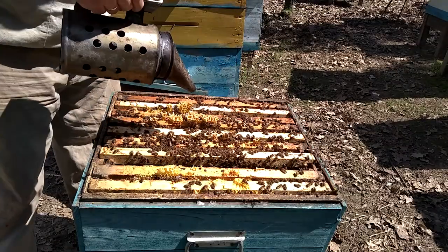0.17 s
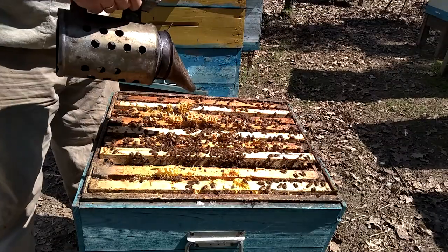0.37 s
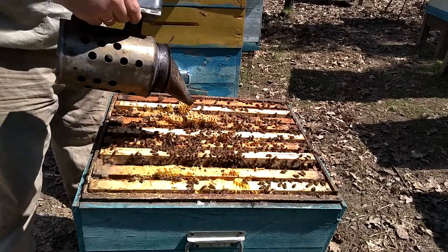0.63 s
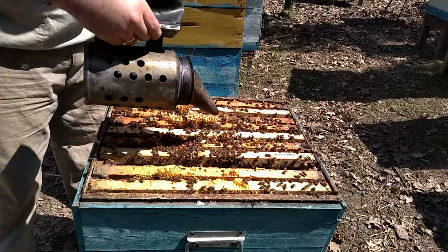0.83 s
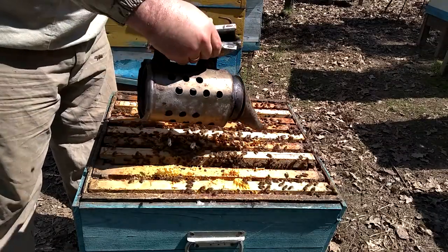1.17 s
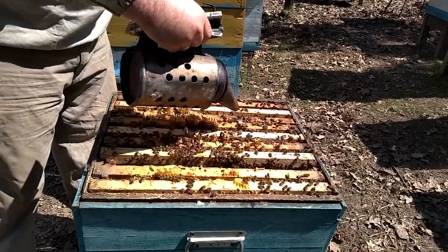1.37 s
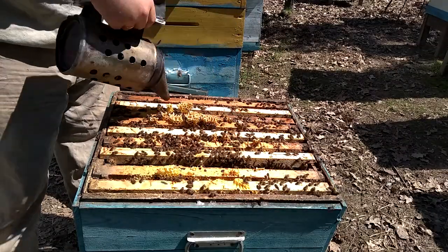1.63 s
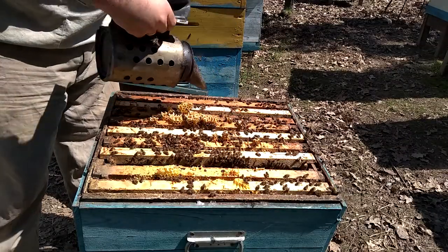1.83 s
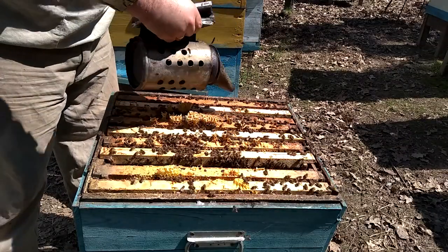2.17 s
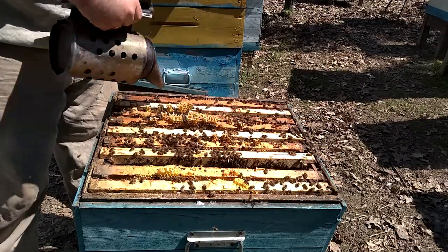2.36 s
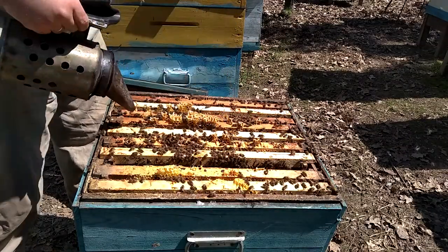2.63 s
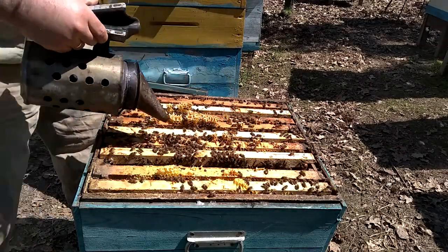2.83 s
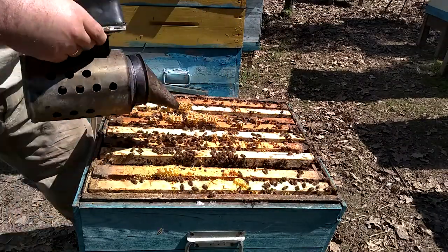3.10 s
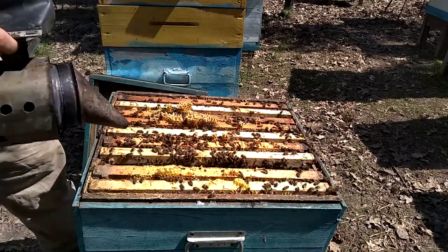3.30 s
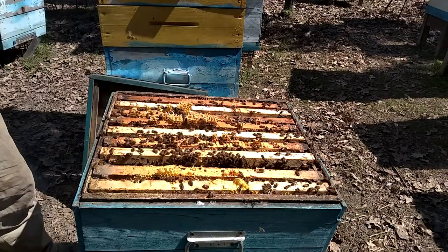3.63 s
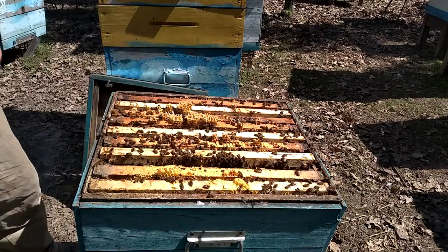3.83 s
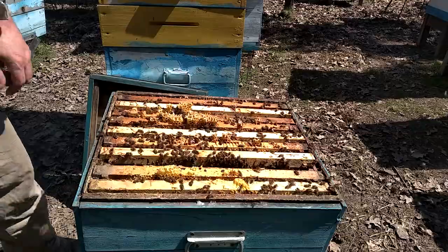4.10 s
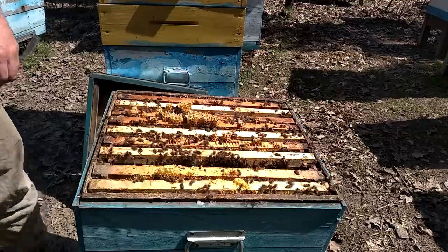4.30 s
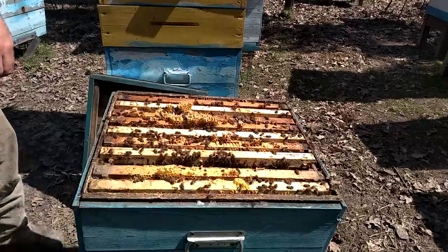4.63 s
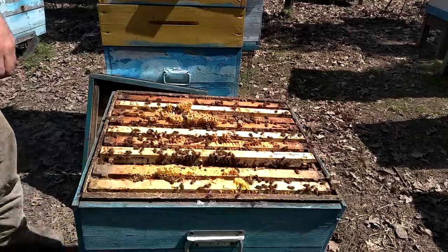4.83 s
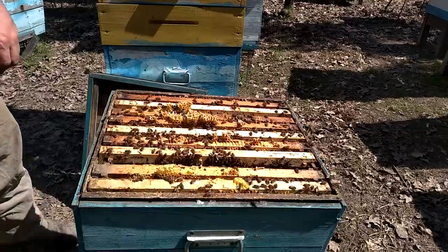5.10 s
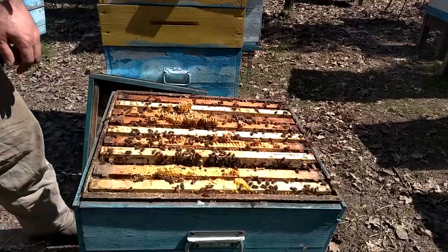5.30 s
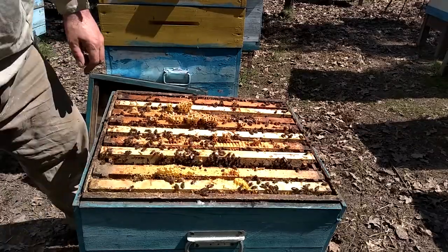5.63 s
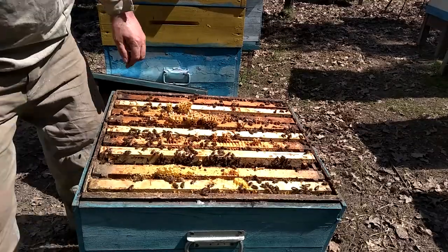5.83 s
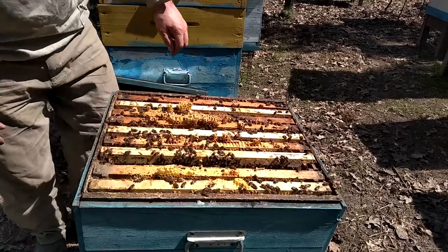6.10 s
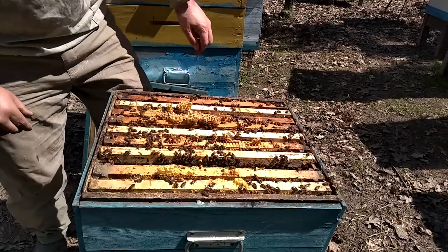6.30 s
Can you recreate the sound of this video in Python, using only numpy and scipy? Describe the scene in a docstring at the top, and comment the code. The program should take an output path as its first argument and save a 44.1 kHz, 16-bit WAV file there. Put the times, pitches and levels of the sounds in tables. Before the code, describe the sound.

A smoker puffs hollowly about five times a second with crinkling leather bellows, then a sharp hollow knock and rough scrape over faint bee hum outdoors.

```python
"""A beekeeper puffs a smoker: air pulses ring the hollow can, and its leather bellows crinkle in grainy bursts.
Close by there are faint squeaks, dry ticks, hard knocks that ring a shell, and brushing made of tiny slips.
Cloth swishes as grainy noise and footsteps thud on soil as short pushes of low noise.
Underneath, bees hum as stacks of harmonics, a small bird whistles in gliding tones, and the air is soft noise."""
import sys
import numpy as np
from scipy import signal
from scipy.fft import rfft, irfft, next_fast_len
from scipy.io import wavfile
from scipy.ndimage import uniform_filter1d, map_coordinates

SR = 44100
rng = np.random.default_rng(int(sys.argv[2]) if len(sys.argv) > 2 else 0)


def to_wav(s):
    """Save 16-bit WAV."""
    ch = np.atleast_2d(s).T  # columns
    pcm = np.round(np.clip(ch, -1, 1) * 32767)  # PCM
    wavfile.write(sys.argv[1], SR, pcm.astype(np.int16))


N = 284841
TIME = np.arange(N) / SR  # seconds

# Colour of small dry crackles. Each row: frequency in Hz, relative level in dB.
LEATHER_COLOUR = [(200, -36), (900, -7.5), (1600, -7), (2400, 1.5), (3100, 0.5), (4000, 0.5), (5000, 3),
                  (6400, -2.5), (7700, -6), (8600, -20), (12000, -26), (16000, -47.5)]


def amp(db):
    """Turns decibels into a plain multiplier."""
    return 10 ** (np.asarray(db) / 20)


def unit(x):
    """Scales a sound to an rms (average strength) of 1."""
    return x / np.sqrt(np.mean(x ** 2) + 1e-20)


def along(points, hz):
    """Reads a curve of (Hz, value) points, with frequency on a log axis."""
    f, v = np.transpose(points)
    return np.interp(np.log(hz + 1), np.log(f + 1), v)


def wobble(rate):
    """A smooth random curve through `rate` random points a second."""
    knots = rng.standard_normal(int(N * rate / SR) + 4)
    coarse_time = TIME[::16]
    return np.interp(TIME, coarse_time, map_coordinates(knots, [coarse_time * rate]))


def filtered(x, response):
    """Multiplies the spectrum of x by a response that depends on frequency."""
    size = next_fast_len(N + SR // 2)
    spectrum = rfft(x, size) * response(np.fft.rfftfreq(size, 1 / SR))
    return irfft(spectrum, size)[..., :N]


def low_cut(x, hz, order):
    """Removes the bass below hz."""
    return signal.sosfilt(signal.butter(order, hz, "high", fs=SR, output="sos"), x)


def resonances(modes, hz):
    """Response of an object that rings at each (Hz, width in Hz, dB), with alternating signs."""
    total = 0
    for k, (centre, width, db) in enumerate(modes):
        ringing = 1j * hz * width / (centre ** 2 - hz ** 2 + 1j * hz * width)
        total = total + (-1) ** k * amp(db) * ringing
    return total


def pan(right_db):
    """Left and right gains of constant power; the right is right_db stronger."""
    gains = amp(np.array([[-1], [1]]) * right_db / 2)
    return gains / np.sqrt(np.mean(gains ** 2, axis=0))


def ports(pair, response):
    """Colours two unrelated signals and mixes them as two spaced microphone ports hear them, at rms 1."""
    # Each row: frequency in Hz, likeness of left and right from 0 to 1.
    alike = [(100, 0.92), (330, 0.8), (650, 0.67), (1300, 0.88), (2200, .52), (3000, 0.81), (4000, 0.25),
             (12000, 0.12)]
    # Each row: frequency in Hz, phase by which the left leads in radians.
    port_lead = [(100, -2), (330, 0.12), (650, 1.4), (1000, 3), (1300, 3.5), (2000, 5), (2800, 4),
                 (3600, 3.2), (5000, 1.58), (12000, 1)]

    def mix(hz):
        turn = np.arccos(np.clip(along(alike, hz), -1, 1)) / 2
        return response(hz) * np.array([np.cos(turn), np.sin(turn)])

    def shift(hz):
        return np.exp(.5j * np.array([[1], [-1]]) * along(port_lead, hz))

    mid, side = filtered(pair, mix)
    return unit(filtered(np.array([mid + side, mid - side]), shift))


def noise(spectrum):
    """Smooth stereo noise of the given colour, at rms 1."""
    return ports(rng.standard_normal((2, N)), lambda hz: amp(along(spectrum, hz)))


def ringing_noise(modes):
    """Stereo noise coloured by the resonances of an object, at rms 1."""
    return ports(rng.standard_normal((2, N)), lambda hz: resonances(modes, hz))


def patches(x, depth_db):
    """Lets the colour shift at random from moment to moment."""
    cells = signal.stft(x, nperseg=256)[2]
    field = rng.standard_normal(cells.shape[1:])
    for _ in range(2):
        field = uniform_filter1d(field, size=3, axis=0)  # smooth over frequency
        field = uniform_filter1d(field, size=7, axis=1)  # smooth over time
    return signal.istft(cells * amp(depth_db * unit(field)), nperseg=256)[1][:, :N]


def grains(spectrum, rate, spread_db, patchy_db):
    """Tiny slips, about `rate` a second, of random size and shifting colour, at rms 1."""
    happens = rng.random(N) < rate / SR
    sizes = amp(spread_db * np.clip(rng.standard_normal(N), -2, 2))
    slips = happens * sizes * rng.standard_normal((2, N))
    return ports(patches(slips, patchy_db), lambda hz: amp(along(spectrum, hz)))


def steady(x, size):
    """Evens out the strength of a sound over `size` samples."""
    power = uniform_filter1d(np.mean(x ** 2, axis=0), size=size)
    power = uniform_filter1d(power, size=size)
    return x / np.sqrt(np.abs(power) + 0.0083)


def swell(s, rise, fall):
    """A rounded push that peaks at s; rise and fall are in seconds."""
    d = TIME - s
    return np.exp(1 - np.hypot(1, np.clip(d / np.where(d < 0, rise, fall), -40, 40)))


def burst(s, t60):
    """A sudden start at s that falls 60 dB in t60 seconds."""
    return (TIME >= s) * amp(-60 * np.clip((TIME - s) / t60, 0, 4))


def slide(s, length, attack, release):
    """A movement that sets in smoothly at s, holds for its length and dies away."""
    onset = (1 - np.exp(-np.maximum(TIME - s, 0) / attack)) ** 2
    return onset * np.exp(-np.clip((TIME - s - length) / release, 0, 40))


def strokes(events):
    """Adds short (start s, stereo sound, dB per octave) events, each tilted about 4 kHz at equal strength."""
    out = np.zeros((2, N + SR))
    size = SR // 4
    octaves = np.log2(np.clip(np.fft.rfftfreq(size, 1 / SR), 1800, 6500) / 4000)
    for s, sound, tilt in events:
        start = round((s - .02) * SR)
        piece = sound[:, start:start + size]
        tilted = irfft(rfft(piece, size) * amp(tilt * octaves), size)
        out[:, start:start + size] += tilted * np.linalg.norm(piece) / np.linalg.norm(tilted)
    return out[:, :N]


def scattered_echo(x, t60):
    """Many thin reflections, as from trunks and hives, arrive from 6 ms on and die away."""
    t = TIME[:SR // 2]
    tail = rng.standard_normal((2, len(t))) * amp(-60 * t / t60) * (t > .006)
    return signal.fftconvolve(x, tail / np.linalg.norm(tail[0]), axes=1)[:, :N]


def outdoor_air():
    """Soft noise whose level drifts slowly."""
    # Each row: frequency in Hz, relative level in dB.
    outdoors = [(15, -61), (25, -37), (123, -9.5), (194, 0), (316, -8), (542, -8), (1180, -5), (1820, -10),
                (2960, -13), (3210, -12.5), (6840, -14), (7620, -13), (8490, -30.5), (12100, -29),
                (15800, -47)]
    return amp(-68.0 + 1.5 * wobble(0.8)) * noise(outdoors) * pan(right_db=0.5)


def wingbeat(hz):
    """The buzz of one bee: 14 harmonics of its wingbeat with an unsteady pitch, at rms 1."""
    # Strength of the buzz. Each row: frequency in Hz, relative level in dB.
    wings = [(150, -10.5), (250, -1), (520, 0), (800, -13), (1500, -15.5), (3000, -30.5), (6000, -44)]
    order = np.arange(1, 15)
    cycle = np.linspace(0, 1, 513)
    phases = rng.random((len(order), 1))
    harmonics = np.sin(2 * np.pi * (order[:, None] * cycle + phases))
    stroke = amp(along(wings, hz.mean() * order)) @ harmonics
    turns = np.cumsum(hz * np.exp(0.023 * wobble(32))) / SR
    return np.interp(turns % 1, cycle, unit(stroke))


def bees(count):
    """Bees swell and fade, each at its own wandering pitch; one comes close, others patter on the frames."""
    # One bee swings close. Each row: moment in seconds, wingbeat in Hz, level in dB.
    bee_passes = [(5.39, 283, -76.5), (5.72, 261, -74.5), (6.359, 262, -64.5)]
    hum = np.zeros((2, N))
    for wing_hz in np.geomspace(180, 272, count):
        bee = wingbeat(wing_hz * np.exp(0.05 * wobble(7))) * amp(4.5 * wobble(2.2))
        hum += bee * pan(right_db=5.5 + 2.7 * rng.standard_normal())
    hum = amp(-72.5) * unit(hum + scattered_echo(hum, t60=0.59))

    times, pitches, _ = np.transpose(bee_passes)
    nearness = sum(amp(db) * swell(s, rise=0.074, fall=.08) for s, _, db in bee_passes)
    close = nearness * wingbeat(np.interp(TIME, times, pitches))

    patter = grains(LEATHER_COLOUR, rate=50, spread_db=-0.5, patchy_db=0.5)
    return hum + close + amp(-86.5) * patter * pan(right_db=6)


def bird():
    """Whistles are single gliding tones with a slight tremble; far calls are narrow bands of noise."""
    # Each row: start in seconds, length in seconds, first pitch in Hz, last pitch in Hz, level in dB.
    whistles = [(2.176, 0.036, 7650, 7850, -64.5), (2.269, 0.098, 7150, 8000, -56),
                (2.742, 0.038, 8050, 7850, -58), (2.836, .14, 7100, 7950, -61),
                (3.204, 0.19, 7050, 7250, -57), (3.746, 0.042, 7800, 7650, -60.5),
                (3.871, .26, 6750, 7850, -57.5), (4.819, 0.1, 7150, 7850, -57.5),
                (6.39, .086, 6950, 7700, -71)]
    # Calls farther off, blurred by the wood. Each row: moment in seconds, level in dB.
    far_birds = [(5.241, -64.5), (5.849, -67.5), (6.0, -76), (6.44, -65)]
    arch_hz_per_s = 1900  # longer whistles arch higher above their straight glide
    song = np.zeros(N)
    tremble = 1 + .011 * wobble(500)
    for s, length, first_hz, last_hz, db in whistles:
        u = np.clip((TIME - s) / length, 0, 1)  # progress through the whistle
        arch = np.sin(np.pi * u)
        hz = first_hz + (last_hz - first_hz) * u + arch_hz_per_s * length * arch
        tone = np.sqrt(2) * np.sin(2 * np.pi * np.cumsum(hz * tremble) / SR)
        song += amp(db) * arch * tone
    song = song * amp(2.4 * wobble(90)) * pan(right_db=8.0)

    calls = sum(amp(db) * swell(s, rise=.04, fall=0.059) for s, db in far_birds)
    band = noise([(5200, -58.5), (6300, -6.0), (7600, -2.0), (8400, -51)])
    far = calls * patches(band, depth_db=1.5) * pan(right_db=-1)
    return song + amp(-14) * scattered_echo(song, t60=.5) + far


def walking():
    """Cloth slides on cloth in grainy swishes, and boots press soil and dead leaves."""
    # A sleeve, then trouser legs.
    # Each row: start in seconds, length in seconds, level in dB, right over left in dB.
    swishes = [(3.045, 0.11, -45, 12), (3.151, 0.052, -56, 11), (5.508, 0.073, -52.5, 9),
               (5.586, 0.05, -52, 14), (5.617, 0.13, -43, 21), (5.682, 0.044, -45, 24)]
    # Footfalls. Each row: moment in seconds, thud level in dB, leaf litter level in dB.
    footfalls = [(4.952, -59.5, -77), (6.026, -43, -64), (6.311, -38.5, -47.5), (6.357, -63, -56)]
    # Colours of cloth and of soil. Each row: frequency in Hz, relative level in dB.
    fabric = [(60, -33), (130, -12), (280, -5.5), (600, -6), (920, -6), (1300, -9), (2000, -2.5),
              (3100, -6.5), (5000, 2.5), (7600, -1), (8800, -12.5), (15800, -24.5)]
    soil = [(25, -23), (60, -32), (110, 3.5), (190, -3.5), (310, -8), (440, -14.5), (700, -24), (2000, -30),
            (6000, -59)]
    cloth = grains(fabric, rate=9200, spread_db=1.5, patchy_db=4.0)
    rub = 0
    for s, length, db, right_db in swishes:
        rub = rub + amp(db) * slide(s, length, attack=0.0085, release=.011) * pan(right_db)
    swish = cloth * rub * amp(0.76 * wobble(70))

    weight = sum(amp(db) * swell(s, rise=0.0082, fall=0.012) for s, db, _ in footfalls)
    thud = weight * steady(noise(soil), size=900) * pan(right_db=6.5)
    # the leaves give just before the thud; they share the grains of the cloth
    crush = sum(amp(db) * swell(s - .006, rise=0.0096, fall=0.01) for s, _, db in footfalls)
    return swish + thud + crush * cloth * pan(right_db=4.5)


def ticks():
    """Small dry things snap: noise that starts at once and dies away."""
    # Each row: moment in seconds, level in dB.
    snap_list = [(3.615, -54.5), (3.759, -59), (3.862, -39), (4.88, -53), (4.929, -42.5), (4.948, -44),
                 (6.305, -47), (6.362, -57)]
    snaps = sum(amp(db) * burst(s, t60=0.037) for s, db in snap_list)
    return snaps * noise(LEATHER_COLOUR) * pan(right_db=15)


def brushing():
    """A surface drags close by: a hiss of dense slips over a lumpy rumble, both swelling with pressure."""
    # Each row: start in seconds, length in seconds, moment of greatest pressure in seconds,
    # relative friction level in dB, relative rumble level in dB.
    brushes = [(3.973, 0.11, 4.02, -30.5, -42), (4.413, 0.3951, 4.608, -21, -33.5)]
    # The surface catches and bumps. Each row: moment in seconds, level in dB.
    bumps = [(4.592, -26.5), (4.597, -30.5), (4.616, -35.5), (4.645, -25.5)]
    # Colours of the hiss and of the rumble. Each row: frequency in Hz, relative level in dB.
    friction = [(250, -29), (600, -10.5), (1000, 2.5), (1300, -2.5), (2200, -3.5), (2600, -3.5),
                (3100, -6.5), (3700, -3.5), (4800, -3), (5450, 1), (5850, -2), (6500, -1.5), (7500, -3),
                (8800, -16.5), (12000, -22), (15800, -29.5)]
    rumble_colour = [(25, -25.5), (55, -13.5), (90, -2.5), (125, 0), (190, -8), (235, -11), (310, 5.5),
                     (400, -1), (510, -12.5), (800, -40.5), (2000, -65.5)]
    slip_lead_s, slip_db = 0.014, -1  # a spurt of hiss just before each bump, relative to it
    hiss = sum(amp(db + slip_db) * swell(s - slip_lead_s, rise=.002, fall=0.0032) for s, db in bumps)
    rumble = sum(amp(db) * swell(s, rise=0.0072, fall=0.0018) for s, db in bumps)
    for s, length, peak_s, hiss_db, rumble_db in brushes:
        pressure = swell(peak_s, rise=0.11, fall=.07)
        attack = 0.092 * length
        # the hiss follows the pressure less strongly than the rumble does
        hiss = hiss + amp(hiss_db) * slide(s, length, attack, release=0.0082) * pressure ** 0.24
        rumble = rumble + amp(rumble_db) * slide(s, length, attack, release=0.021) * pressure

    slips = grains(friction, rate=25000, spread_db=2.0, patchy_db=3.5)
    # a short scattered echo makes the colour uneven
    slips = unit(slips + 0.61 * scattered_echo(slips, t60=.035))
    slips = steady(slips, size=250) * amp(1.1 * wobble(110))
    # the hiss lies to the right; the long stroke swings through the middle
    place = pan(9.5 - 9.5 * swell(4.615, rise=0.1, fall=0.051))
    return hiss * slips * place + rumble * steady(noise(rumble_colour), size=600) * pan(right_db=3)


def knock():
    """Hard contacts rattle a shell, heard as ringing noise, and sound a hollow note."""
    # Each row: moment in seconds, level in dB, time to fall 60 dB in seconds,
    # brightness in dB per octave, hollow note level in dB.
    knocks = [(3.9893, -21.5, 0.063, -2, -33), (3.9935, -21.5, 0.046, -4.5, -19.5),
              (4.026, -24.5, 0.076, 2, -24.5), (5.661, -56.5, 0.036, -5, -47)]
    # What the shell rings with. Each row: frequency in Hz, width in Hz, relative level in dB.
    shell = [(370, 150, -5.5), (791, 25, 5), (990, 120, -9), (1440, 115, 3), (2310, 63, 6.5),
             (3750, 150, -0.5), (4650, 45, 11), (5470, 200, 3.5), (6840, 90, -3), (7480, 400, 1.5)]
    ring = steady(ringing_noise(shell), size=200) * pan(right_db=1.5)
    crack = strokes((s, amp(db) * burst(s, t60) * ring, tilt) for s, db, t60, tilt, _ in knocks)
    note_hz = 795
    note = 0
    for s, *_, db in knocks:
        note = note + amp(db) * burst(s, t60=0.051) * np.sin(2 * np.pi * note_hz * (TIME - s))
    return crack + note * pan(right_db=5.0)


def squeaks():
    """Tiny rough squeaks: quick swells of noise centred near 5 kHz."""
    # Each row: moment in seconds, level in dB.
    squeak_list = [(0.221, -62), (0.435, -60.5), (.49, -71), (.748, -65), (1.096, -62), (1.141, -61)]
    rasp = noise([(3000, -32), (4600, 6), (5300, 4), (7000, -15), (9000, -43)])
    swells = sum(amp(db) * swell(s, rise=0.00087, fall=0.0069) for s, db in squeak_list)
    return swells * rasp * pan(right_db=5)


def bellows():
    """Each leather fold gives way suddenly and crinkles on, weakening; quick folds are the brightest."""
    # Mostly as a squeeze begins. Each row: start in seconds, length in seconds, starting level in dB.
    creases = [(0.244, .015, -61.5), (0.689, 0.016, -49), (0.811, 0.04, -45.5), (1.412, 0.032, -47.5),
               (1.646, 0.031, -58.5), (1.83, 0.015, -46.5), (1.851, 0.075, -57), (1.905, 0.0044, -48),
               (1.973, 0.0084, -53), (2.025, 0.0091, -47), (2.041, .044, -39), (2.279, 0.028, -40.5),
               (2.314, 0.0034, -52), (2.44, 0.024, -42), (2.5, 0.034, -33.5), (2.695, .026, -24),
               (2.846, 0.026, -47.5), (2.902, 0.011, -33)]
    sag_db_per_s = 149
    tilt_db, dulling_db_per_s = 2, 98  # dB per octave of a very quick fold, and its loss per second of length
    flutter = amp(2.7 * wobble(220))
    leather = grains(LEATHER_COLOUR, rate=6000, spread_db=1.5, patchy_db=3.0)
    crinkle = steady(leather * flutter, size=700) * pan(right_db=8.5)
    folds = []
    for s, length, db in creases:
        sag = amp(-sag_db_per_s * np.clip(TIME - s, 0, length))
        fold = slide(s, length, attack=0.0022, release=0.01) * sag
        folds.append((s, amp(db) * fold * crinkle, tilt_db - dulling_db_per_s * length))
    return strokes(folds)


def smoker():
    """Each squeeze drives air through the can, which answers with a hollow note under the rush of air."""
    # Squeezes, about five a second.
    # Each row: moment in seconds, relative level of the hollow tone in dB, relative level of the rush in dB.
    puffs = [(0.255, -54.5, -66.5), (0.475, -53, -63), (0.671, -41.5, -55.5), (0.888, -47, -56.5),
             (1.084, -51.5, -63.5), (1.276, -42.5, -55), (1.483, -50.5, -62.5), (1.698, -57.5, -67),
             (1.903, -46, -58.5), (1.986, -58.5, -67), (2.108, -38.5, -54.5), (2.32, -35, -51.5),
             (2.531, -37, -51), (2.719, -32.5, -38), (2.928, -35, -47), (3.122, -39.5, -51),
             (3.342, -58, -59.5)]
    # What the can rings with. Each row: frequency in Hz, width in Hz, relative level in dB.
    can = [(271, 28.4, 12.5), (330, 70, -10), (423, 32, -3.5)]
    # Colour of the rushing air. Each row: frequency in Hz, relative level in dB.
    rush_colour = [(30, -12), (80, 9.5), (160, -6), (260, -3), (550, 5), (800, -1), (1100, 1), (1800, -1),
                   (3000, -4.5), (8000, -13.5), (16000, -96)]
    push, flow = 0, 0
    for s, hollow_db, rush_db in puffs:
        # the air starts moving, then surges as the bellows close
        start = .5 * swell(s - .019, rise=0.0058, fall=0.006)
        surge = swell(s + 0.0032, rise=0.0054, fall=0.0058)
        push = push + amp(hollow_db) * (start + surge)
        flow = flow + amp(rush_db) * swell(s, rise=0.013, fall=0.012)

    def can_response(hz):
        return resonances(can, hz) / (1 + (hz / 900) ** 2)  # duller above 900 Hz

    hollow = steady(ports(rng.standard_normal((2, N)), can_response), size=450)
    jet = grains(rush_colour, rate=22000, spread_db=1.5, patchy_db=4.0)
    tone = amp(1.5) * push * hollow * pan(right_db=19)
    rush = amp(2) * flow * jet * pan(right_db=7)
    return low_cut(tone + rush, hz=184, order=2)


def scene():
    """Near sounds with their outdoor echo, over bees, bird and soft air."""
    near = smoker() + bellows() + squeaks() + knock() + brushing() + ticks() + walking()
    echo = amp(-27.5) * scattered_echo(near, t60=0.34)
    return near + echo + bees(count=20) + bird() + outdoor_air()


def record(dry):
    """Cuts the deep bass and fades out everything above the top of the band."""
    top_hz = 15750
    return filtered(low_cut(dry, hz=78, order=4), lambda hz: np.clip((top_hz - hz) / 400 + .5, 0, 1))


dry = scene()
out = record(dry)
to_wav(out)
```